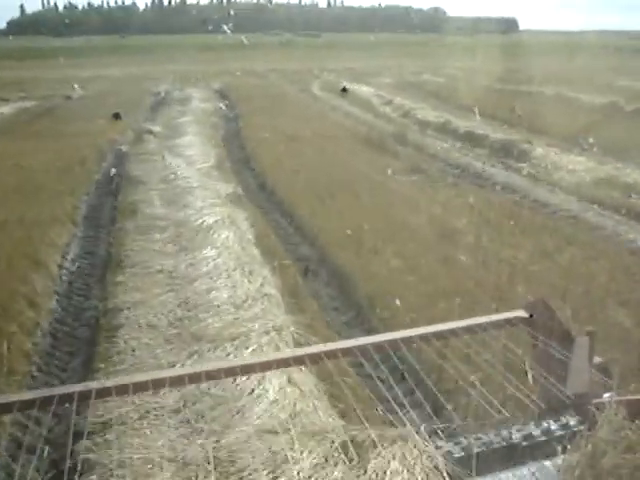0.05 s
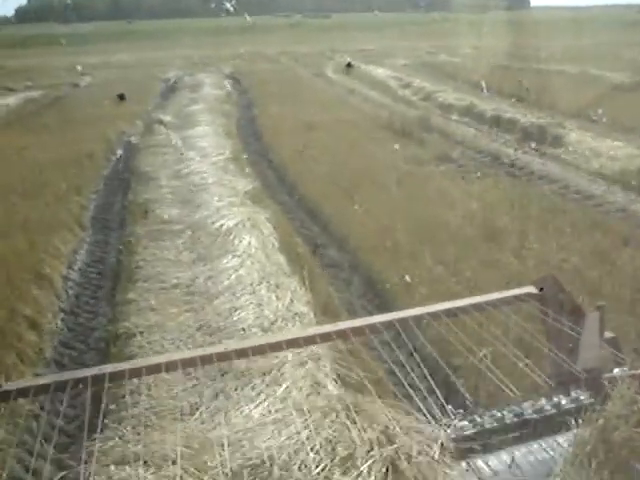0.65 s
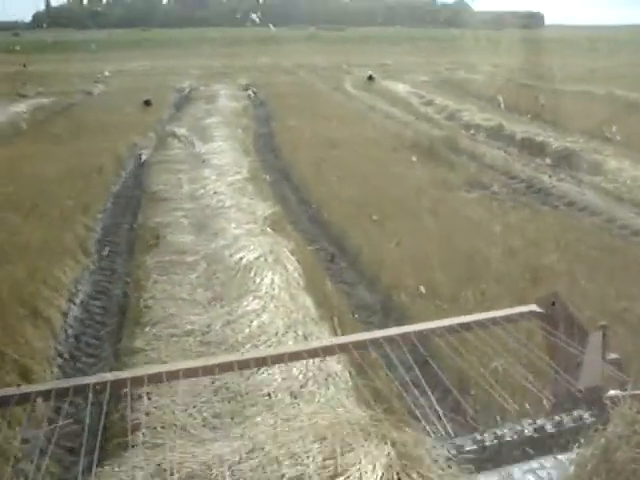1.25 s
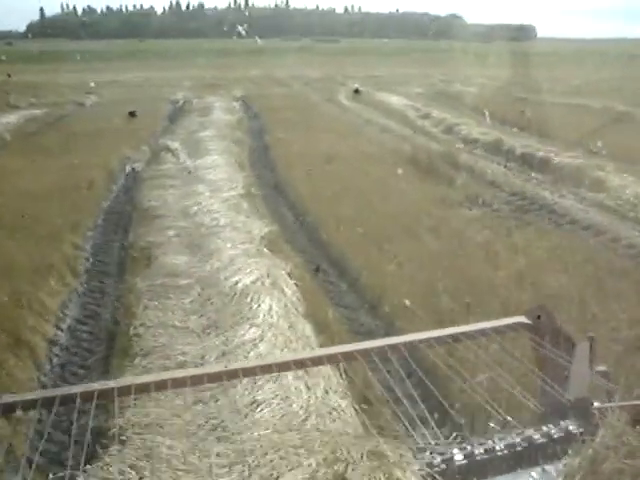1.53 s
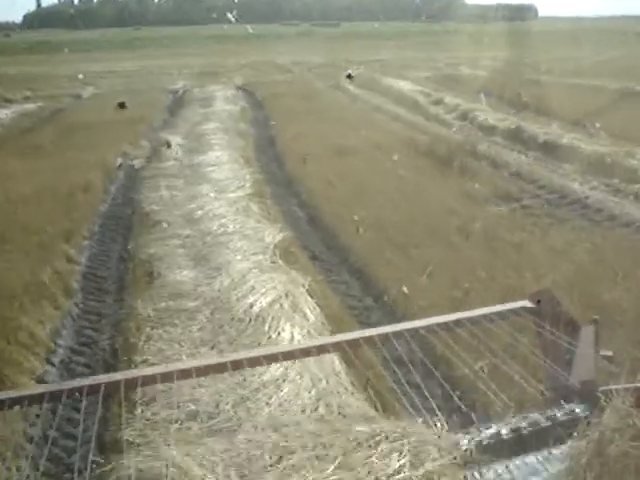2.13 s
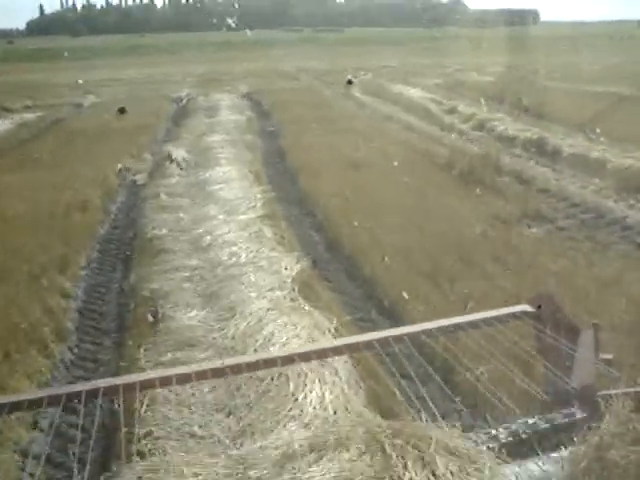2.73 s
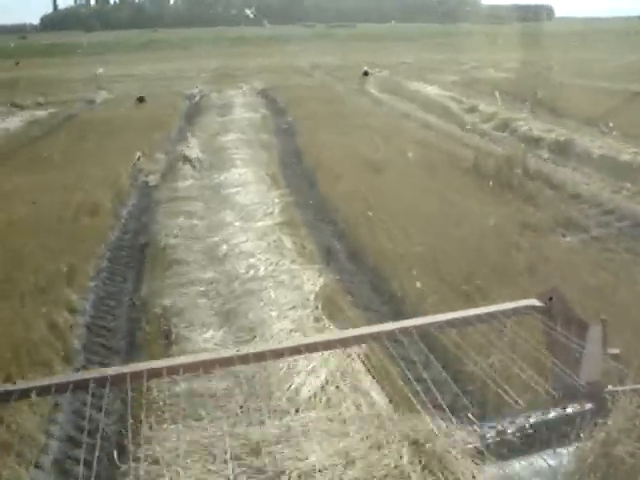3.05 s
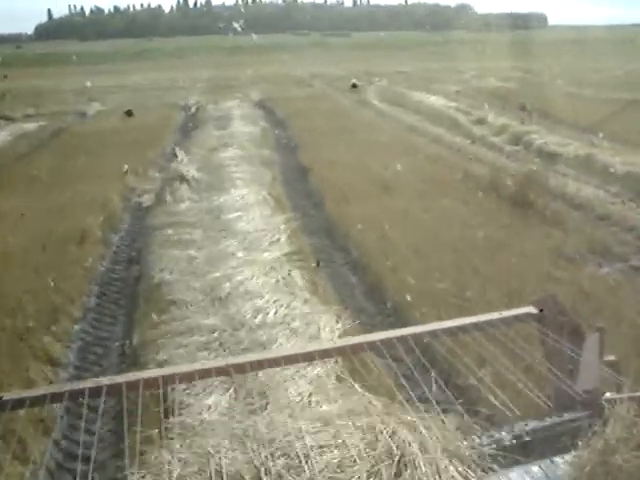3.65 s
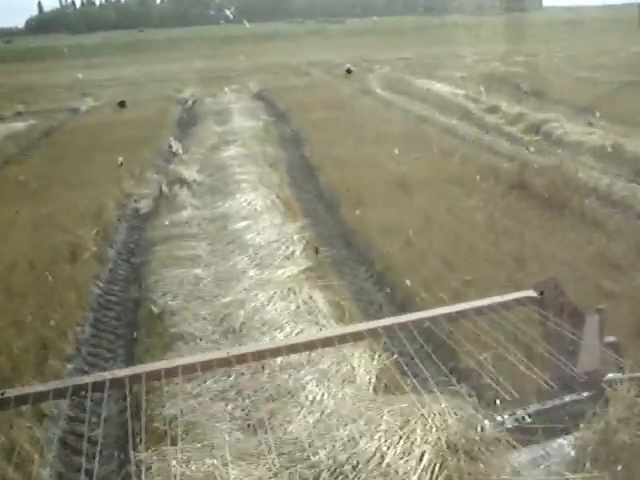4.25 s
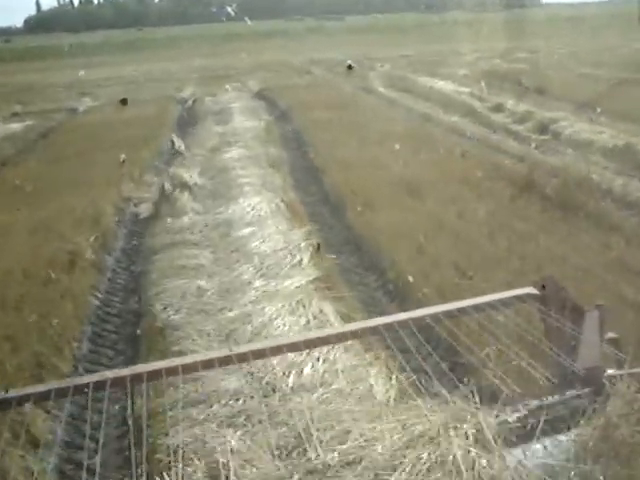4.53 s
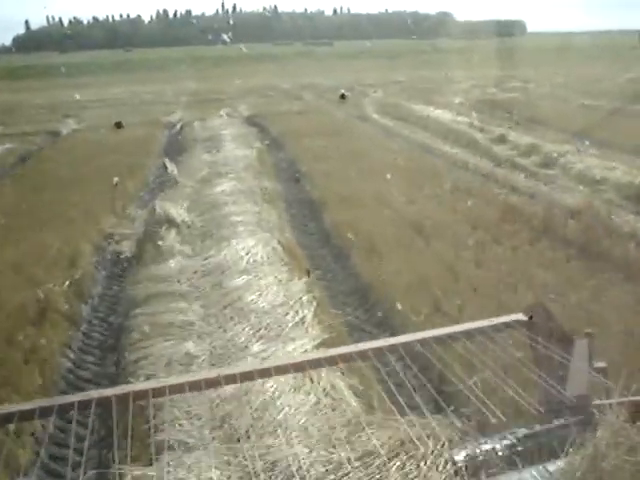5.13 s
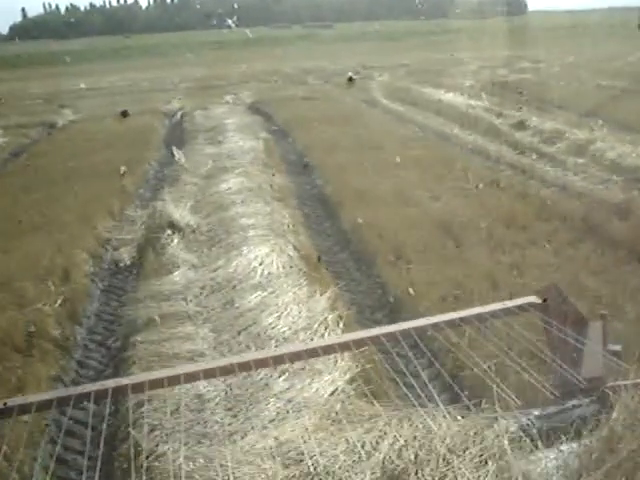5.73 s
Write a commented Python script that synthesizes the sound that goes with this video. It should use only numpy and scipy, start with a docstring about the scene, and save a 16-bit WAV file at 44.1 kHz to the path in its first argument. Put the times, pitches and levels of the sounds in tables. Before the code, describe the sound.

A combine harvester runs at constant speed, heard from the driver's seat inside the cab. A diesel drone and deep threshing rumble lie under a strong, slightly pulsing fan hum and a thinner hydraulic whine. Straw rustles and hisses lightly throughout as it feeds in. Now and then a loose fitting gives a brief rattle or straw scrapes faintly on sheet metal, and one tiny high squeak comes late on.

```python
"""Inside the cab of a combine harvester that picks up a swath at steady, governed speed.
Rotating parts give tones: a six-cylinder diesel drones, unbalanced shafts shake the floor, a fan hums
and a hydraulic pump whines. Random impacts give noise that follows the flow of crop: straw rumbles
through the threshing drum and rustles over the header. Wads scrape the header's sheet metal,
loose cab fittings rattle now and then, and a dry joint gives one broken squeak."""
import sys
import numpy as np
from scipy import signal
from scipy.fft import rfft, irfft
from scipy.io import wavfile

SR = 44100
rng = np.random.default_rng(int(sys.argv[2]) if len(sys.argv) > 2 else 0)


def pcm_store(signal):
    """Save signal as 16-bit PCM."""
    levels = np.round(np.clip(np.atleast_2d(signal), -1, 1) * 32767)
    wavfile.write(sys.argv[1], SR, levels.astype(np.int16).T)


N = 259296
TIME = np.arange(N) / SR
FREQS = np.arange(N // 2 + 1) * SR / N


def undb(db):
    """Amplitude ratio of a level in decibels."""
    return 10 ** (np.asarray(db) / 20)

def unit(x):
    """Normalisation to rms 1."""
    return x / np.sqrt(np.mean(x ** 2))

def curve(points):
    """Linear interpolation of (seconds, value) points at every sample."""
    return np.interp(TIME, *np.transpose(points))

def walk(hz):
    """Slow random fluctuation: noise low-passed at hz, with rms 1."""
    return unit(irfft(rfft(rng.standard_normal(N)) / (1 + (FREQS / hz) ** 4) * (FREQS > 0), N))

def turns(hz):
    """Phase in radians as the integral of frequency, from a random start."""
    return 2 * np.pi * (np.cumsum(hz * np.ones(N)) / SR + rng.random())

def tone(phase, db):
    """A sinusoid at an rms level."""
    return np.sqrt(2) * undb(db) * np.sin(phase)

def colour(x, spectrum):
    """Spectral shaping by (Hz, dB) points, to rms 1."""
    hz, db = np.transpose(spectrum)
    gain = undb(np.interp(np.log(np.maximum(FREQS, 1)), np.log(hz), db))
    return unit(irfft(rfft(x) * gain, N))

def ring(x, hz, width):
    """Resonance: two like band-pass stages in series, each `width` Hz wide."""
    b, a = signal.iirpeak(hz, hz / width, fs=SR)
    return signal.lfilter(b, a, signal.lfilter(b, a, x))

def impacts(per_s, spread_db):
    """Shot noise: impulses at random times and of uneven size, with rms 1."""
    hits = rng.random(N) < per_s / SR
    return unit(hits * rng.standard_normal(N) * undb(spread_db * rng.standard_normal(N)))

def swell(middle, length):
    """A raised-cosine pulse, above half height for `length` seconds."""
    return np.cos(np.pi / 2 * np.clip((TIME - middle) / length, -1, 1)) ** 2

def throb(hz, peak_s):
    """Sinusoidal modulation of +-1 with a crest at peak_s."""
    return np.cos(2 * np.pi * hz * (TIME - peak_s))

def easing(db_per_s=0.12):
    """A slow linear decline in dB, zero at mid-time."""
    return -db_per_s * (TIME - TIME.mean())


# Diesel partials. Each row: multiple of the four-stroke cycle rate, rms level in dB.
DIESEL_PARTIALS = [(2, -43.5), (3, -48.5), (5, -45), (6, -38), (7, -63), (8, -42.5), (10, -57), (14, -50.5),
                   (15, -47), (16, -53), (17, -53), (22, -52.5), (25, -56.5), (28, -58), (33, -62),
                   (37, -52.5), (48, -52.5), (51, -65), (53, -60), (57, -68.5), (59, -60.5), (94, -60.5)]

def engine(cycle, waver_db=2.2, waver_rad=0.39):
    """Periodic combustion gives harmonics; each wavers in level and phase as the firings vary."""
    out = np.zeros(N)
    for order, db in DIESEL_PARTIALS:
        phase = round(order) * cycle + 2 * np.pi * rng.random() + waver_rad * walk(6)
        out += tone(phase, db + waver_db * walk(3.6) + easing())
    return out


# Hum of shafts and belts. Each row: frequency in Hz, rms level in dB.
SHAFT_TONES = [(21.9, -58.5), (28.1, -46), (45.2, -42), (47.8, -52), (50.7, -43), (135.9, -43),
               (280.3, -43.5)]

def shafts(slip=0.0045):
    """Rotating unbalance forces vibration; belts slip a little and close frequencies beat."""
    return sum(tone(turns(hz * (1 + slip * walk(1.54))), db + 3.1 * walk(4)) for hz, db in SHAFT_TONES)


# Course of the fan's hum. Each row: time in seconds, level in dB.
FAN_LEVEL = [(0, -29), (.65, -29.5), (.8, -29), (1.15, -27.5), (1.35, -33.5), (1.75, -30), (2.55, -27.5),
             (2.82, -31.5), (3.3, -28), (3.85, -29), (4.55, -31.5), (5.15, -29), (5.88, -32)]

def fan(blade_hz=404.4, beat_hz=6.56, flutter_db=1.0):
    """The blade-passing tone beats against a weaker tone just below it; its octave sounds above."""
    level_db = curve(FAN_LEVEL)
    blade = turns(blade_hz * (1 + .0006 * walk(2)))
    neighbour = blade - 2 * np.pi * beat_hz * (TIME - .147)
    db = level_db + flutter_db * walk(22)
    octave = tone(2 * blade, level_db.mean() - 12.5 + 2.5 * walk(4.2))
    return tone(blade, db) + tone(neighbour, db - 14) + octave


# Course of the pump's whine under load. Each row: time in seconds, level in dB.
PUMP_LEVEL = [(0, -43), (.5, -44), (1.05, -40), (1.35, -43.5), (1.65, -40), (2.1, -43.5), (2.4, -40.5),
              (2.85, -45), (3.1, -43), (3.7, -45), (4.02, -50.5), (4.4, -45), (4.95, -42), (5.88, -52.5)]
# Pump partials. Each row: multiple of the piston rate, offset from the mean level in dB,
# rms flutter in dB, factor on the level's swing.
PUMP_PARTIALS = [(1, 3, 1.5, 0.7), (2, -5.5, 0, .3), (4, 1.73, 0.8, 1.35), (5, -9.5, 1.5, 1),
                 (7, -19, 3, 0.3), (8, -28, 1, .3), (9, -21, 1.5, 0.2), (11, -19.5, 1.5, 0)]

def pump(piston_hz=422.15, wander=0.000874, jitter=.00059, throb_db=1.3):
    """Pressure ripple from the pistons gives harmonics that throb, flutter and swell with the load."""
    db = curve(PUMP_LEVEL)
    piston = turns(piston_hz * (1 + wander * walk(1.42) + jitter * walk(18)))
    swing_db = db - db.mean() + throb_db * throb(hz=6.925, peak_s=.071)
    return sum(tone(round(order) * piston, db.mean() + offset + factor * swing_db + flutter * walk(14))
               for order, offset, flutter, factor in PUMP_PARTIALS)


# Slow feed of crop. Each row: time in seconds, flow in dB relative to the usual flow.
CROP_FEED = [(0, -0.2), (.68, 0.6), (.85, 2.5), (1.15, 0.8), (1.45, -1.7), (1.67, .4), (1.95, -0.15),
             (2.5, 1.5), (2.85, -1.5), (3.07, -0.5), (3.5, 0.65), (4.1, -1.6), (4.62, -1.5), (4.9, 1.6),
             (5.45, -1.4), (5.88, -0.7)]
# Brief swells (+) and dips (-) in the level of the rumble and hiss.
# Each row: middle in seconds, length in seconds, change of level in dB.
SWELLS_AND_DIPS = [(0.233, 0.051, 2), (0.636, 0.033, -5.5), (1.12, .05, 2.5), (1.525, .04, -2),
                   (2.09, 0.04, 2.5), (2.555, 0.054, 1.5), (2.625, 0.039, -4), (3.08, 0.065, 1.6),
                   (4.037, 0.036, 2.5), (4.384, 0.059, 2.3), (4.484, 0.051, -2), (5.314, 0.041, 3.5),
                   (5.455, 0.028, -2), (5.713, 0.091, 3), (5.77, .06, -5)]

def noise_envelope(uneven_db=0.56):
    """Common modulation in dB: threshing and straw noise follow the feed, and briefly swell and dip."""
    brief_db = sum(db * swell(middle, length) for middle, length, db in SWELLS_AND_DIPS)
    return curve(CROP_FEED) + brief_db + uneven_db * walk(24)


# Modes of the cab's panels. Each row: frequency in Hz, stage bandwidth in Hz, relative gain in dB.
PANEL_MODES = [(555, 29, -7.5), (706, 29.4, -3), (776, 46, -4), (821, 42, -6.5), (865, 23.4, -6.5),
               (944, 31, -8.5), (1115, 36, -12)]
# Spectra of the drum's roar and the housing's rumble. Each row: frequency in Hz, relative density in dB.
ROAR_SPECTRUM = [(250, -19.5), (400, -6.5), (490, -0.5), (630, -2.5), (850, -5.5), (1020, -12),
                 (1200, -11.5), (1500, -15), (1720, -13), (1930, -17), (2220, -14), (2500, -30),
                 (4000, -35.5)]
RUMBLE_SPECTRUM = [(15, -35), (32, -23), (48, -9), (60, -12.5), (78, -9.5), (100, -2), (122, 0),
                   (155, -3.5), (185, -3.5), (255, -3.5), (320, -10), (420, -7.5), (520, -22.5),
                   (900, -48.5)]

def threshing(cycle, drum, envelope_db, panel_db=-37, body_db=-33, rumble_db=-27):
    """Impact excitation: crop knocks in the drum and rings the cab's panels, over a low rumble."""
    knocks = impacts(6000, 2.6) * drum * undb(0.59 * walk(28))
    panels = unit(sum(undb(db) * ring(knocks, hz, width) for hz, width, db in PANEL_MODES))
    body = colour(impacts(9000, 1.96) * drum * undb(0.78 * walk(19)), ROAR_SPECTRUM)
    roar = undb(panel_db) * panels + undb(body_db) * body
    crank = 1 + 0.14 * np.sin(2 * cycle)  # the crankshaft shakes the housing once a revolution
    rumble = colour(rng.standard_normal(N) * crank, RUMBLE_SPECTRUM)
    rumble *= undb(rumble_db + easing() + 0.37 * walk(26))
    return undb(envelope_db) * (roar + rumble)


# Spectra of the stalks' rustle and the chaff's hiss. Each row: frequency in Hz, relative density in dB.
STALK_SPECTRUM = [(1200, -23.5), (2300, 3.5), (2800, 1.5), (3100, -3), (3800, -4), (4500, -8), (5150, -5.5),
                  (6500, -16), (10000, -25)]
CHAFF_SPECTRUM = [(2000, -9), (4500, 0), (5600, 1.5), (6800, -3), (8000, -1.5), (10000, -1.5)]

def straw(drum, envelope_db, stalk_db=-49, chaff_db=-51.5, tine_hz=6.14, tine_db=0.87):
    """Amplitude-modulated noise: stalks and chaff surge as each row of pickup tines lifts the swath."""
    surge = undb(0.74 * walk(9.9) + tine_db * throb(tine_hz, peak_s=.145))
    drum_pulse = 1 + 0.95 * (drum - 1)
    stalks = colour(impacts(16000, 3.7), STALK_SPECTRUM) * undb(stalk_db + 0.85 * envelope_db)
    chaff = colour(rng.standard_normal(N), CHAFF_SPECTRUM)
    chaff *= undb(chaff_db + 0.72 * envelope_db + 1.1 * walk(14))
    return surge * drum_pulse * (stalks + chaff)


# Modes of the header's sheet. Each row: frequency in Hz, stage bandwidth in Hz, relative gain in dB.
SHEET_MODES = [(3430, 220, -5.5), (3780, 230, -2.5), (4160, 160, -4.5), (5300, 140, -9.5)]
# Scraping wads. Each row: middle in seconds, length in seconds, level at the crest in dB.
WAD_SCRAPES = [(1.05, 0.44, -54.5), (3.33, 0.63, -57), (4.28, 0.13, -53.5)]

def scrape(light_rub_db=-71, uneven_db=2.5):
    """Friction excites the sheet metal's modes, lightly throughout and harder under each wad of straw."""
    wads = sum(undb(db) * swell(middle, length) for middle, length, db in WAD_SCRAPES)
    rub = impacts(8000, 1.6) * undb(-uneven_db * walk(25))
    sheet = unit(sum(undb(db) * ring(rub, hz, width) for hz, width, db in SHEET_MODES))
    return (undb(light_rub_db) + wads) * sheet


# Loose fittings. Each row: crest time in seconds, level there in dB, pitch in Hz, length in seconds.
FITTING_RATTLES = [(0.8, -43.5, 3800, .018), (2.075, -45, 3180, 0.025), (2.585, -49, 3300, 0.017),
                   (4.363, -48, 3000, .018), (4.41, -48, 3000, .022), (5.726, -43, 2600, .025)]

def rattles(relative_width=0.51):
    """Repeated contact: short flurries of clicks excite a heavily damped resonance in a fitting."""
    out = np.zeros(N)
    for crest, db, hz, length in FITTING_RATTLES:
        rise_s = length / 2
        age = np.maximum(TIME - crest + rise_s, 0) / rise_s
        clicks = unit(ring(impacts(4800, 2), hz, hz * relative_width))
        out += undb(db) * clicks * age * np.exp(1 - age)
    return out


# The two parts of the squeak. Each row: start in seconds, length in seconds, first and last
# frequency in Hz, level at the crest in dB.
JOINT_SQUEAKS = [(4.496, 0.039, 7160, 6900, -52), (4.536, 0.028, 6880, 6900, -50.5)]

def squeaks(waver=.009):
    """Stick-slip oscillation in a dry joint gives a thin, unsteady note."""
    out = np.zeros(N)
    for start, length, first_hz, last_hz, db in JOINT_SQUEAKS:
        progress = np.clip((TIME - start) / length, 0, 1)
        hz = (first_hz + (last_hz - first_hz) * progress) * (1 + waver * walk(200))
        out += tone(turns(hz), db) * np.sqrt(np.abs(np.sin(np.pi * progress)))
    return out


def scene(cycle_hz=20.94, drum_hz=22.44):
    """Superposition of all the machine's sources at the driver's seat."""
    envelope_db = noise_envelope()
    cycle = turns(cycle_hz * (1 + 0.00093 * walk(.9)))  # one cycle is two crankshaft revolutions
    drum = 1 + 0.087 * np.sin(turns(drum_hz * (1 + .012 * walk(2.6))))  # harder knocks once a turn
    thresher = threshing(cycle, drum, envelope_db)
    drives = engine(cycle) + shafts() + fan() + pump()
    return (drives + thresher + straw(drum, envelope_db) + scrape() + rattles() + squeaks())[None]

def record(dry, cutoff_hz=10020, fade_s=.004):
    """Band limiting: a steep low-pass removes the top treble, and both ends fade briefly."""
    fade = np.clip(np.minimum(TIME, TIME[-1] - TIME) / fade_s, 0, 1)
    lowpass = signal.ellip(12, .2, 80, cutoff_hz, fs=SR, output="sos")
    return fade * signal.sosfilt(lowpass, dry)


dry = scene()
out = record(dry)
pcm_store(out)
```